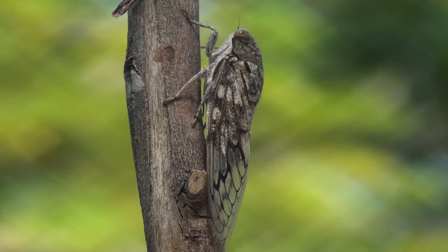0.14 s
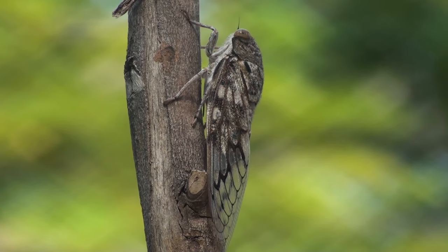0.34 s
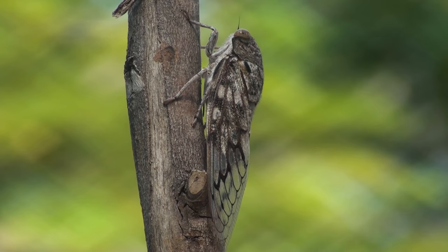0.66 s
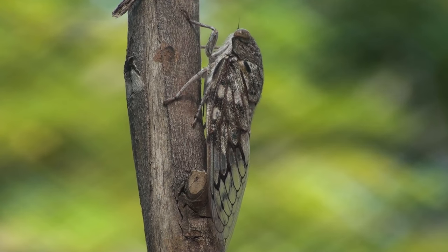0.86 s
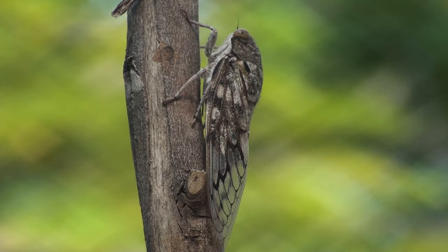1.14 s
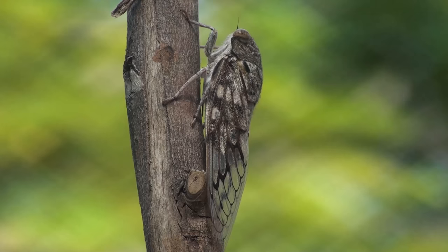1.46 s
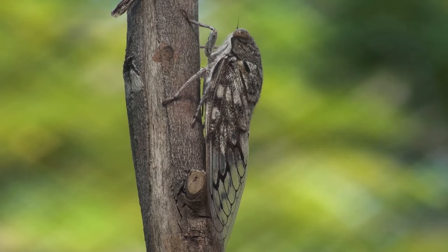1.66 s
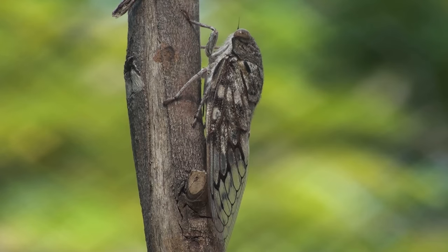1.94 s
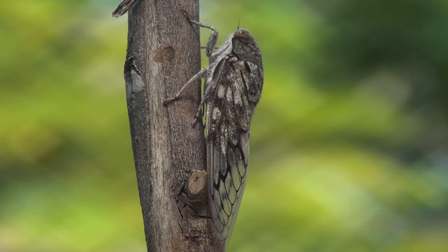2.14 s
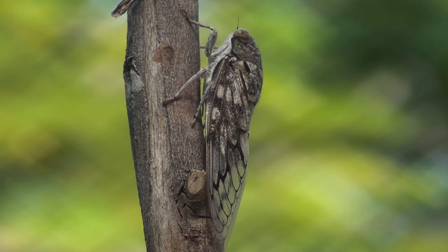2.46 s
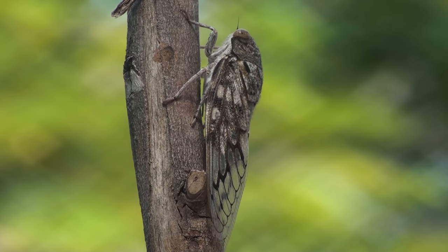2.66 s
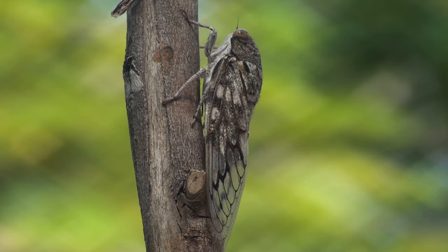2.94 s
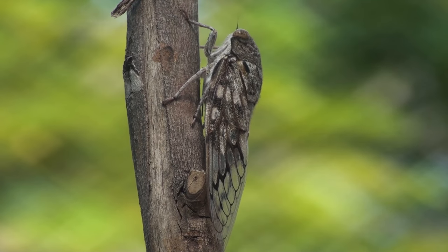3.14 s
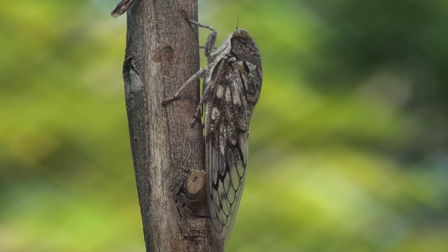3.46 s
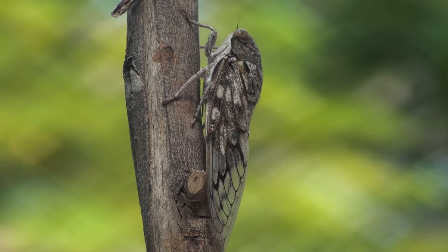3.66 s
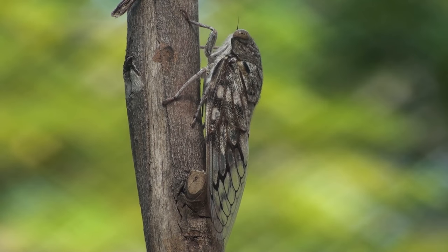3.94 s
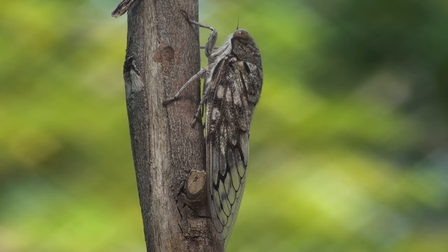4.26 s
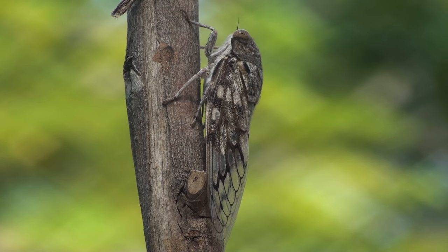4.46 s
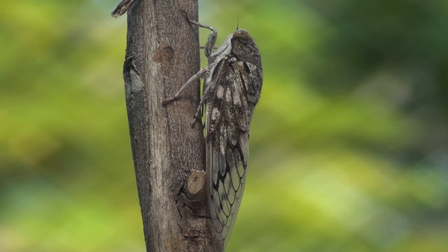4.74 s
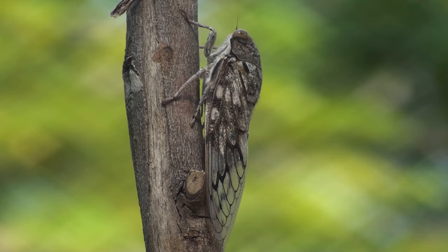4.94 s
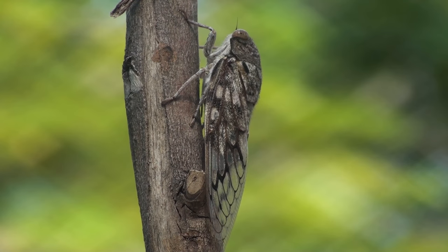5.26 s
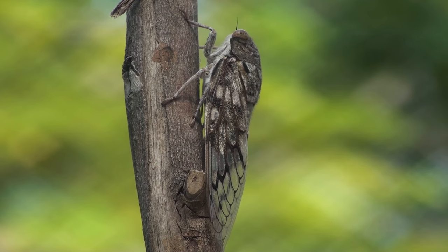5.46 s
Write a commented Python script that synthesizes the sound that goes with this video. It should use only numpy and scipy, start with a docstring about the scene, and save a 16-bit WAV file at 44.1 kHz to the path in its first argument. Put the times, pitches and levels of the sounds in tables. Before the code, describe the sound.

Outdoors among trees, the microphone is near cicadas whose high, piercing buzz fills the whole stretch. Far behind it a small engine putters with two faint pips, then a second comes in, speeds up and gives way to a third. Soft raspy swells and a thin whistle sit over a low wash of traffic and leaves, with a few quiet chirps late on.

```python
"""From the start, cicadas sing in a tree over a far chorus, a thin insect whistle, traffic and leaves.
Their ribbed membranes buckle four times a muscle cycle, and the clicks excite resonances of the body.
A small engine putters, each firing ringing its exhaust, and rattles with two faint pips.
Hoarse swells come and go. Around 1 s the song slackens, then a second engine comes in and speeds up.
Near 4 s come a few short chirps, and that engine gives way to a third."""
import sys
import numpy as np
from scipy import signal
from scipy.fft import rfft, irfft, next_fast_len
from scipy.io import wavfile

SR = 44100
rng = np.random.default_rng(int(sys.argv[2]) if len(sys.argv) > 2 else 0)


def materialize(psi):
    """Save the field psi as 16-bit PCM at rate SR to the path in sys.argv[1].

    A 1-D psi becomes a single channel; in a 2-D psi each row is a channel.
    """
    bounded = np.clip(np.atleast_2d(psi).T, -1, 1)
    quanta = np.round(bounded * 32767).astype(np.int16)
    wavfile.write(sys.argv[1], SR, quanta)


N = 246519
TIME = np.arange(N) / SR


def amp(db):
    """Amplitude ratio of a level in decibels."""
    return 10 ** (np.asarray(db) / 20)


def unit_rms(x):
    """Normalisation to unit mean power."""
    return x / np.sqrt(np.mean(abs(x) ** 2) + 1e-20)


def in_time(points):
    """Linear interpolation of (time, value) points at every sample."""
    return np.interp(TIME, *np.transpose(points))


def at_hz(points, hz):
    """Interpolation of a spectrum on a logarithmic frequency axis."""
    frequencies, values = np.transpose(points)
    return np.interp(np.log(hz), np.log(frequencies), values)


def drift(corner_hz):
    """Slow random fluctuation: low-pass noise of unit rms."""
    step, settle = 40, 2000   # audio samples per point, points dropped
    r = np.exp(-2 * np.pi * corner_hz * step / SR)
    slow = signal.lfilter([1], [1, -2 * r, r * r], rng.standard_normal(N // step + settle + 2))[settle:]
    return np.interp(np.arange(N) / step, np.arange(len(slow)), unit_rms(slow))


def resonate(x, hz, width_hz):
    """Two identical damped resonators in cascade: steep skirts, unit peak gain."""
    r = np.exp(-np.pi * width_hz / SR)
    stage = [(1 - r * r) / 2, 0, (r * r - 1) / 2, 1, -2 * r * np.cos(2 * np.pi * hz / SR), r * r]
    return signal.sosfilt([stage, stage], x)


def pan(db):
    """Direction by level difference, left minus right."""
    return amp(np.array([[.5], [-.5]]) * db)


def rib_clicks(cycles_per_s, ribs=4, wander=.0015, jitter_s=3e-5, habit=.65):
    """Buckling: a nearly periodic impulse train, each rib tending to snap with its own polarity."""
    phase = np.cumsum(ribs * cycles_per_s * (1 + wander * drift(1.3))) / SR + rng.random()
    at = np.flatnonzero(np.diff(np.floor(phase)))
    at += np.round(rng.normal(0, jitter_s * SR, N)[:len(at)]).astype(int)
    own_sign = np.resize(rng.choice([-1, 1], ribs), len(at))
    flip = np.where(rng.random(N) < habit, 1, rng.choice([-1, 1], N))[:len(at)]
    clicks = np.zeros(N)
    clicks[at.clip(0, N - 1)] = own_sign * flip
    return clicks


def branches(size, echo_db=-1.5, t60_s=.14):
    """Scattering: the spectrum of the direct sound plus decaying echoes off branches and leaves."""
    t = np.arange(6000) / SR
    tail = rng.standard_normal(len(t)) * amp(-60 * t / t60_s) * (t > 4e-3)
    return unit_rms(1 + amp(echo_db) * rfft(tail / np.linalg.norm(tail), size))


# modes of the hollow body: (frequency [Hz], width [Hz], relative level [dB])
BODY_MODES = [(4250, 140, -26), (4490, 170, -16), (4720, 220, -9), (4880, 80, -6), (5080, 270, -4),
              (5290, 300, -8), (5480, 60, -9), (5640, 250, -5), (5780, 100, -5), (5900, 140, -1),
              (6020, 130, -3), (6230, 300, -1), (6310, 50, -6), (6460, 280, -4), (6820, 310, -14),
              (6960, 110, -10), (7080, 100, -4), (7270, 280, -5), (7490, 80, -10), (7690, 130, -17),
              (7900, 100, -17), (8050, 590, -20), (8350, 380, -17), (9000, 440, -27), (9420, 970, -26),
              (10170, 270, -23), (10590, 2090, -29), (12240, 1920, -40), (13920, 2040, -51),
              (15600, 1290, -44)]

def body_response(hz, size):
    """Modal resonance: the powers add, and folding the cepstrum gives the minimum phase."""
    power = sum(amp(2 * db) / (1 + (2 * (hz - at) / width_hz) ** 2) ** 2
                for at, width_hz, db in BODY_MODES)
    cepstrum = irfft(.5 * np.log(power), size)
    cepstrum[1:size // 2] *= 2
    cepstrum[size // 2 + 1:] = 0
    return np.exp(rfft(cepstrum))


# near singers: (muscle rate [cycles/s], relative level [dB], left minus right [dB])
SINGERS = [(102.9, -1.5, 1), (104.9, -4, -1), (106.1, .5, 0), (107.7, -4, 1)]
# stereo width: (frequency [Hz], side gain [dB])
SONG_WIDTH = [(4100, -50), (4400, -17.5), (5200, -14.5), (6200, -15.5), (7200, -16.5), (8200, -12),
              (9500, -11), (10900, -7), (11400, -54)]
# slackening of the song, shared out among its lobes: (time [s], level change [dB])
SLACKENING = [(0, -.5), (.5, -0.5), (.65, -1.5), (1.55, -1.5), (1.8, 0.2), (2.4, 0), (4.5, 0.5),
              (5.59, -.5)]
# boundaries of the spectral lobes: (frequency [Hz])
LOBE_EDGES = [0, 5420, 6750, 7580, 8700, 9950, 10350, 23000]
# lobes, low to high: (level [dB], share of the slackening [ratio], creep [dB/s])
LOBES = [(-22.0, 0.47, -0.13), (-17.0, 0.87, -0.0958), (-23.5, 0.33, 0.16), (-33, 0.2, .3),
         (-39, -0.19, -0.04), (-45.3, .3, 1), (-42, -0.81, -0.17)]

def cicadas(chorus_db=2.0):
    """Source and filter: near clicks and the noise-like far chorus excite the body modes."""
    size = next_fast_len(N + 8192) * 2
    hz = np.fft.rfftfreq(size, 1 / SR)
    near = unit_rms(sum(amp(db) * pan(pan_db) * rfft(rib_clicks(rate), size) * branches(size)
                        for rate, db, pan_db in SINGERS))
    far_mid, far_side = rfft(rng.standard_normal((2, N)), size) / np.sqrt(N) * branches(size)
    body = body_response(hz, size)
    mid = (near.mean(axis=0) + amp(chorus_db) * far_mid) * body
    side = (near[0] - near[1] + 1.44 * far_side) * body * amp(at_hz(SONG_WIDTH, hz + 1))
    stereo = np.array([mid + side, mid - side])
    song, slack_db = 0, in_time(SLACKENING)
    for low, high, (level_db, share, creep) in zip(LOBE_EDGES, LOBE_EDGES[1:], LOBES):
        lobe = irfft(stereo * ((hz >= low) & (hz < high)), size)[:, :N]
        song += amp(level_db + share * slack_db + creep * TIME) * unit_rms(lobe)
    return song * pan(.18)


# envelope of the whistle: (time [s], level [dB])
WHISTLE_LEVEL = [(0, -53), (.4, -47), (1.6, -47), (2.1, -54), (4.3, -54), (4.6, -61), (5.59, -61)]

def insect_whistle():
    """Narrow-band resonance gives noise a thin pitch."""
    tone = resonate(rng.standard_normal(N), hz=3965, width_hz=95)
    return amp(in_time(WHISTLE_LEVEL)) * unit_rms(tone)


# background spectrum: (frequency [Hz], relative spectral density [dB])
AIR_SPECTRUM = [(18, -24), (32, -10), (60, -1), (110, -2), (230, -6.5), (440, -17.5), (620, -19),
                (1100, -18), (1500, -22), (2100, -21.5), (2700, -24.5), (3200, -32), (3600, -20.5),
                (4300, -20)]
# its envelope: (time [s], level [dB])
AIR_LEVEL = [(0, -34.5), (.5, -38), (.62, -40), (1.3, -39.5), (1.8, -38), (3.3, -37.5), (4.0, -38),
             (4.6, -38.5), (5.1, -38), (5.59, -37)]
# its likeness in the two channels: (frequency [Hz], coherence [ratio])
AIR_COHERENCE = [(30, 0.91), (60, 1), (130, 0.96), (290, 0.92), (640, 0.5), (1100, 0.68), (1700, 0.81),
                 (2500, 1)]
# its direction: (frequency [Hz], left minus right [dB])
AIR_BALANCE = [(30, 2), (110, -1.5), (200, 3), (380, 3), (700, 5), (1290, 2), (2380, 0)]

def traffic_and_leaves(flicker_db=1.5, rumble_db=-1.5):
    """Partly coherent noise: distant sources merge in third-octave bands that flicker independently."""
    out, edges = 0, 20 * 2 ** np.arange(0, 7.8, 1 / 3)
    white = rng.standard_normal((2, 2, N))
    for k, (low, high) in enumerate(zip(edges, edges[1:])):
        band = signal.butter(2, [low, high], "band", fs=SR, output="sos")
        mid, side = signal.sosfilt(band, white[k % 2])
        hz = np.sqrt(low * high)
        coherence = at_hz(AIR_COHERENCE, hz)
        stereo = np.sqrt(1 + coherence) * mid + np.sqrt(1 - coherence) * side * [[1], [-1]]
        band_db = at_hz(AIR_SPECTRUM, hz) + flicker_db * drift(6.9) + rumble_db * (hz < 300)
        out += amp(band_db) * pan(at_hz(AIR_BALANCE, hz)) * stereo
    return amp(in_time(AIR_LEVEL)) * unit_rms(out)


# low, middle and upper exhaust modes: (frequency [Hz], width [Hz], relative gain [dB])
BOOM_MODES = [(63, 19, -4), (91.7, 18.6, 10.5)]
MIDDLE_MODES = [(132.8, 43, 3.5), (172, 56, -4), (231, 88, -10.5)]
BARK_MODES = [(556, 31, -10.5), (730, 19, -9), (896, 31, -18), (1142, 120, -19)]
# pace, one curve per engine: (time [s], firing rate [1/s])
FIRING_RATES = [
    [(0, 17.9), (.75, 18.9)],
    [(1.1, 16.6), (1.75, 18.3), (2.15, 18.4), (3, 21), (3.5, 22.5), (4.15, 24.3)],
    [(3.9, 17.3), (4.7, 18.8), (5.59, 19.2)],
]
# small far engines: (full from [s], full until [s], middle level [dB], extra boom [dB], extra bark [dB])
ENGINES = [(-.3, 0.51, -42, -1.2, 4.5), (1.45, 3.895, -41.5, -7, -3.5), (4.6, 5.3, -44, -3.5, -3)]

def engine(pace, from_s, until_s, level_db, boom_db, bark_db, uneven_db=1.1, puff=.15, puff_s=.012):
    """Impulse excitation: each firing drives the exhaust modes with a thud and a puff of noise."""
    rate = in_time(pace)
    firings = np.diff(np.floor(np.cumsum(rate) / SR + .65), prepend=0)
    thuds = firings * amp(rng.normal(0, uneven_db, N))
    puff_envelope = signal.lfilter([1], [1, -np.exp(-1 / (puff_s * SR))], thuds)
    drive = unit_rms(thuds) + puff * unit_rms(puff_envelope * rng.standard_normal(N))
    boom, middle, bark = (sum(amp(db) * resonate(drive, hz, width_hz) for hz, width_hz, db in modes)
                          for modes in (BOOM_MODES, MIDDLE_MODES, BARK_MODES))
    revving = np.clip(rate - 21.5, 0, 1)   # boom and bark thin out above this firing rate
    boom *= amp(boom_db - 10 * revving)
    bark *= amp(bark_db - 7 * revving)
    fade_db = 41 * (from_s - TIME).clip(0) + 66 * (TIME - until_s).clip(0)   # dB/s in and out of earshot
    return amp(level_db - fade_db) * (boom + middle + bark) / np.std(middle)


# swells: (midpoint [s], duration [s], centre frequency [Hz], crest level before rasp [dB])
SWELLS = [(0.058, 0.22, 1160, -54), (0.501, .3, 1064, -51), (0.798, .3, 1120, -50), (1.6, .2, 1080, -48.5),
          (1.792, .33, 1110, -45.5), (2.031, .3, 1090, -53.5), (2.949, .26, 1094, -47),
          (4.101, 0.46, 1097, -48), (4.982, .18, 1122, -50), (5.283, .3, 1116, -47.5)]

def hoarse_swells(half_width_hz=60, sag_hz_per_s=220, rasp_db=2):
    """Random modulation: slow noise spreads a falling tone into a narrow, rasping band."""
    low_pass = signal.butter(2, half_width_hz, fs=SR, output="sos")
    slow = unit_rms(signal.sosfilt(low_pass, rng.standard_normal((2, N))))
    out = np.zeros(N)
    for middle_s, length_s, hz, db in SWELLS:
        progress = np.clip((TIME - middle_s) / length_s + .5, 0, 1)
        phase = 2 * np.pi * np.cumsum(hz - sag_hz_per_s * length_s * (progress - .5)) / SR
        out += amp(db) * np.sin(np.pi * progress) * (slow[0] * np.cos(phase) + slow[1] * np.sin(phase))
    return out * amp(rasp_db * drift(38))


# two rattle pips, then chirps:
# (onset [s], duration [s], start frequency [Hz], end frequency [Hz], peak level [dB])
PIPS_AND_CHIRPS = [(0.128, 0.013, 1890, 1900, -38), (0.184, 0.012, 1830, 1900, -36),
                   (.67, 0.064, 1317, 1300, -46), (4.012, 0.048, 1880, 1880, -39),
                   (4.073, .035, 1800, 1770, -46), (4.285, 0.015, 4000, 3350, -42),
                   (4.313, 0.019, 3260, 3120, -37)]

def pips_and_chirps():
    """Frequency modulation: short sines glide linearly under rounded envelopes."""
    out = np.zeros(N)
    for onset_s, length_s, start_hz, end_hz, db in PIPS_AND_CHIRPS:
        progress = np.clip((TIME - onset_s) / length_s, 0, 1)
        hz = start_hz + (end_hz - start_hz) * progress
        envelope = np.sqrt(np.sin(np.pi * progress).clip(0))
        out += amp(db) * envelope * np.sin(2 * np.pi * np.cumsum(hz) / SR)
    return out


def scene():
    """Superposition: cicadas in front, engines and hoarse swells a little to the left."""
    steady = cicadas() + insect_whistle() + traffic_and_leaves()
    road = sum(engine(pace, *row) for pace, row in zip(FIRING_RATES, ENGINES))
    return steady + road * pan(3.2) + hoarse_swells() * pan(2.5) + pips_and_chirps()


def record(dry, cutoff_hz=15720):
    """Band limiting: a steep low-pass filter removes the highest treble."""
    return signal.sosfilt(signal.ellip(12, .3, 70, cutoff_hz, fs=SR, output="sos"), dry)


dry = scene()
out = record(dry)
materialize(out)
```